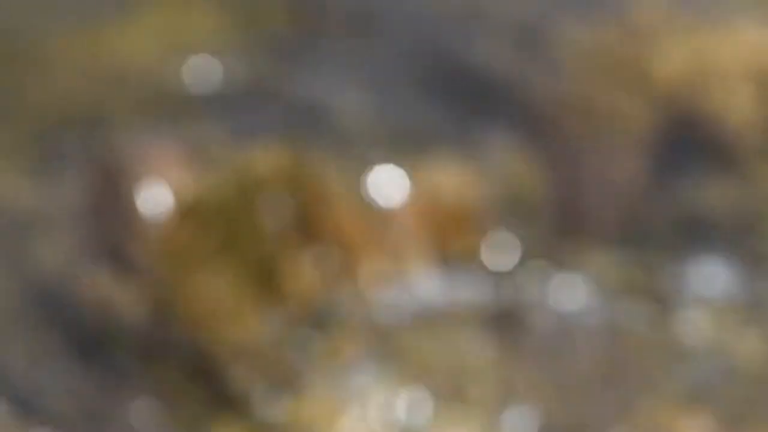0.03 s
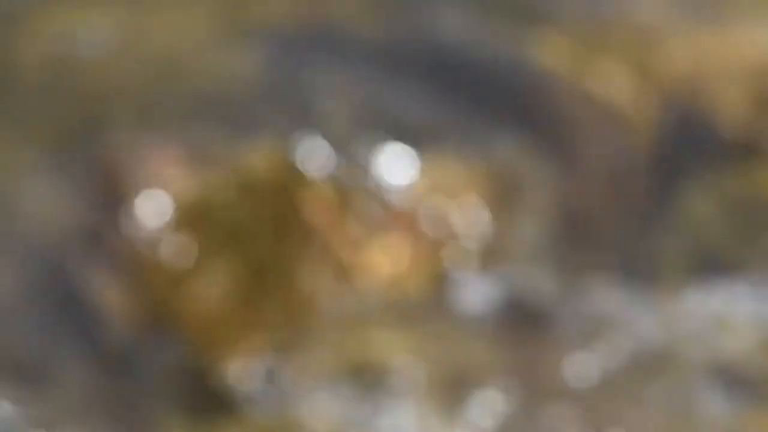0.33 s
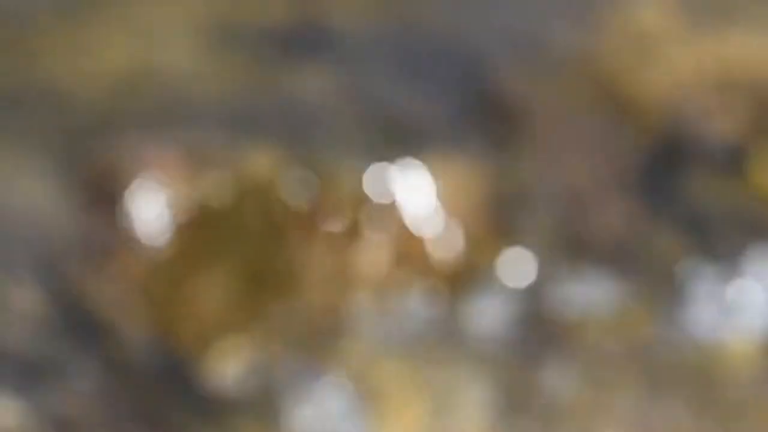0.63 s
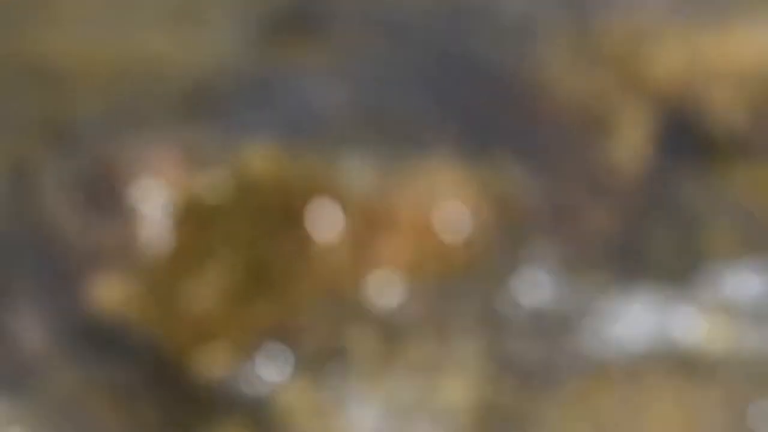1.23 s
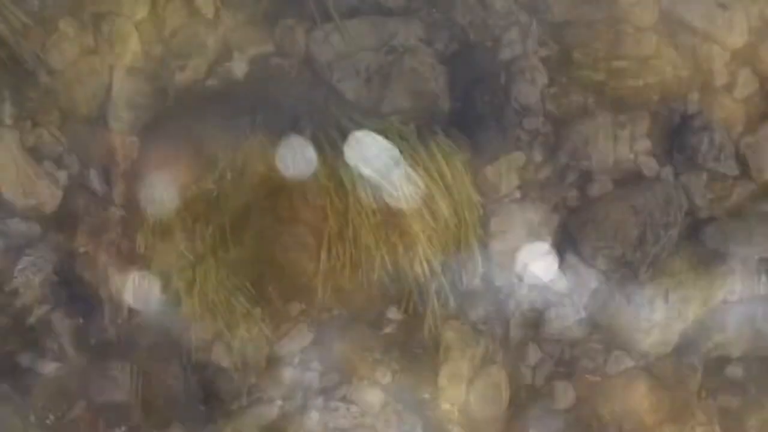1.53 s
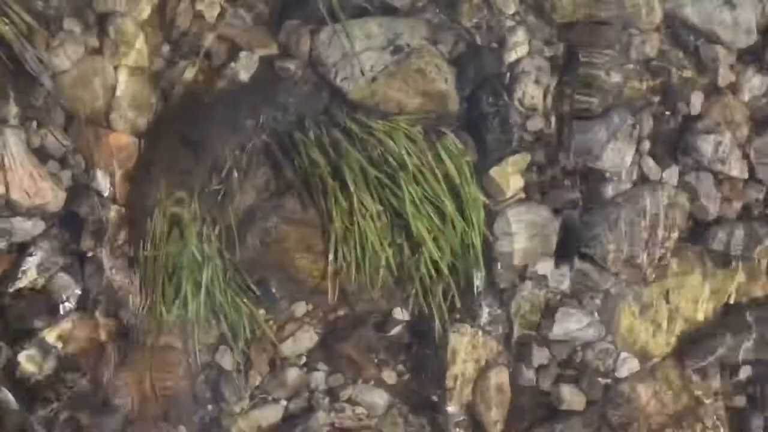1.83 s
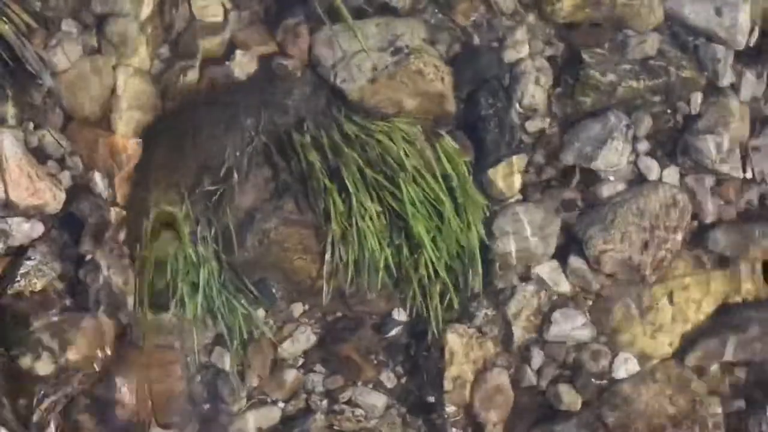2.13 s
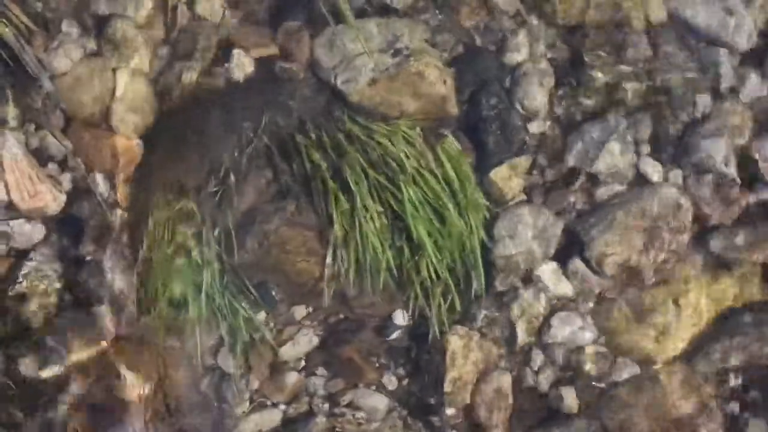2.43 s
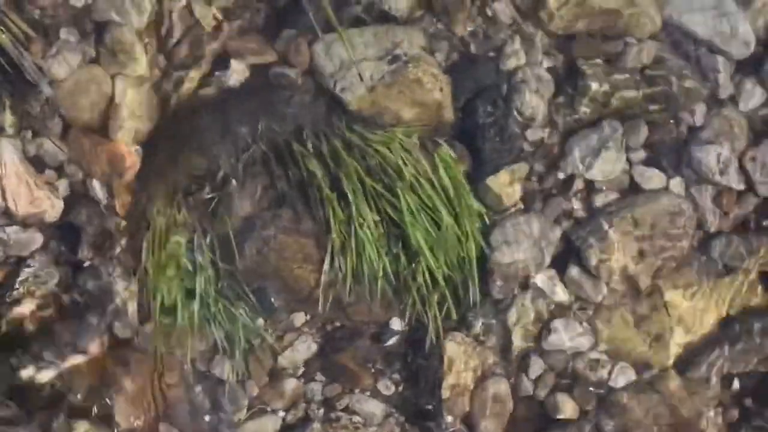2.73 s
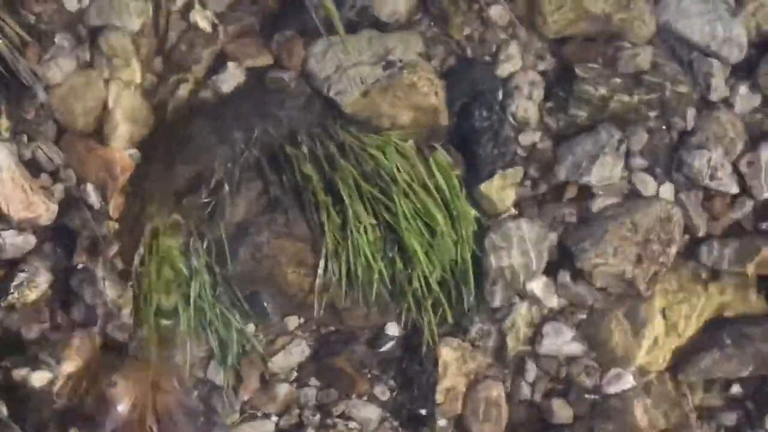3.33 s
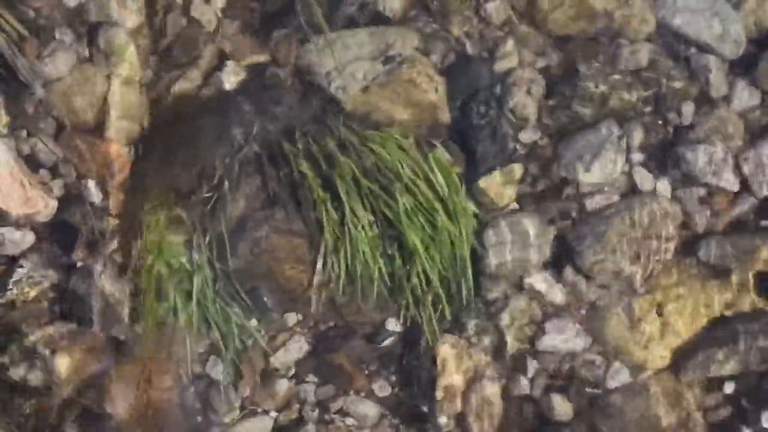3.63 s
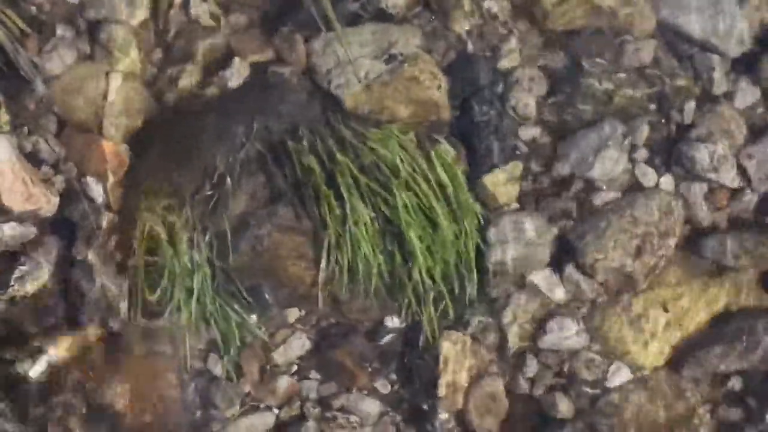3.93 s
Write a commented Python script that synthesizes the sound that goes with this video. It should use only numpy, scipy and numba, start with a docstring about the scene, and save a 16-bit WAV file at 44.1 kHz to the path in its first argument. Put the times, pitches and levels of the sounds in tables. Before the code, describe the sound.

Water trickles quietly round a stone, then gives way to a louder, steady stream rush.

```python
"""A quiet trickle round a stone, close by, wide in the treble, over a low rumble of air on the microphone.
It cross-fades into a louder, steady mono riffle: shallow water running fast over pebbles.
Both are swarms of bubbles, ringing as dying sines of rising pitch, and ticks of spray over a noise wash.
Single near bubbles plop and drops slap the surface throughout."""
import sys
import numpy as np
from scipy import signal
from scipy.fft import rfft, irfft
from scipy.io import wavfile
from numba import njit

SR = 44100
rng = np.random.default_rng(int(sys.argv[2]) if len(sys.argv) > 2 else 0)


def master_out(mix):
    """Clip the mix to full scale and print it as 16-bit PCM to the path in sys.argv[1]."""
    frames = np.transpose(np.atleast_2d(mix))
    ceiling = np.clip(frames, -1, 1)
    pcm = np.round(ceiling * 32767).astype(np.int16)
    wavfile.write(sys.argv[1], SR, pcm)


N = 176400
TIME_S, BIN_HZ = np.arange(N) / SR, np.arange(N // 2 + 1) * SR / N

# air rumble, spectral density: f/Hz, level/dB
RUMBLE_SPECTRUM = [(12, 9.5), (30, -7), (48, 4), (60, -8.5), (80, -5.5), (105, -19.5), (135, -10.5),
                   (165, -26.5), (260, -20.5)]
# air rumble, envelope: t/s, level/dB
RUMBLE_ENVELOPE = [(0, -58), (.22, -58.5), (.28, -53.5), (.38, -58), (.44, -58), (0.698, -57.5), (1.3, -58),
                   (1.5, -63.5), (1.75, -67), (2.0, -74), (4, -74.5)]
# trickle, spectral density: f/Hz, level/dB
TRICKLE_SPECTRUM = [(110, -20), (170, -9.5), (250, -5), (400, -4), (660, -2.5), (850, -4.5), (1250, -3),
                    (1600, -7.5), (2100, -10.5), (2700, -16.5), (3800, -19.5), (5500, -27), (8000, -26),
                    (13000, -26), (15000, -38)]
# flow of the trickle: t/s, gain/dB
TRICKLE_ENVELOPE = [(0, 2), (.22, 1.5), (.32, 0.5), (.39, 2.5), (.5, 0.5), (.78, -1), (.86, -1), (.97, 0.5),
                    (1.05, -2), (1.2, 0), (1.3, -5.5), (1.39, -5), (1.45, -2.5), (1.52, -2.5), (1.6, -29)]
# stereo width of the trickle: f/Hz, side minus mid/dB
TRICKLE_SIDE = [(60, -24), (130, -39), (290, -14.5), (640, -13.5), (1410, -10), (3100, -3.5), (6820, 0),
                (15000, 2)]
# fizz where the trickle breaks on the stone: t/s, boost/dB
FIZZ_SPURTS = [(.04, 3), (.17, 8), (.26, 8), (.38, 5), (.44, 5), (.55, 7), (.59, 6), (.75, 5), (.79, 7.5),
               (.97, 5), (1.125, 7), (1.16, 7), (1.22, 4), (1.32, 7), (1.44, 10), (1.505, 4)]
# riffle, spectral density: f/Hz, level/dB
RIFFLE_SPECTRUM = [(65, -66), (110, -33.5), (297, -6), (423, -3), (542, -6), (680, 0), (1050, 0),
                   (1490, -1), (1920, -4.5), (2260, -3.5), (3420, -8.5), (4120, -12), (9050, -15.5),
                   (12900, -23), (15500, -31)]
# near bubbles: t/s, f/Hz, peak/dB, T60/s, rise per T60/fraction of f, rms wobble/fraction of f
NEAR_BUBBLES = [(.05, 590, -60, .06, 0, .05), (.273, 640, -55, .11, .5, .03),
                (.304, 3050, -60, .035, 0, .01), (.347, 650, -60, .08, .7, .04),
                (.376, 1240, -55.5, .035, .2, .04), (.377, 2050, -61, .025, 0, .05),
                (.388, 1600, -57, .04, .3, .05), (.403, 590, -59, .06, 0, .03),
                (.506, 1320, -51.5, .028, .05, .02), (.541, 4650, -63, .025, .02, .02),
                (.68, 1260, -56, .09, 1.0, .04), (.887, 1200, -60, .07, .7, .06),
                (.999, 1160, -52.5, .08, .35, .04), (1.036, 2130, -55, .055, .2, .07),
                (1.067, 1150, -59, .05, 0, .15), (1.081, 1110, -60, .04, .2, .1),
                (1.213, 1200, -61, .06, .3, .12), (1.283, 820, -63, .08, .3, .04),
                (1.334, 2150, -66, .04, .1, .09), (1.969, 1510, -39, .04, .05, .02),
                (1.997, 1880, -41, .035, .05, .02), (2.444, 1250, -39, .04, .1, .03),
                (2.474, 1520, -40, .04, .05, .08), (2.516, 2650, -39.5, .018, .05, .01),
                (2.531, 3440, -41, .02, .05, .01), (2.55, 3450, -40, .025, 0, .02),
                (2.601, 1020, -41, .045, .05, .03), (3.335, 2100, -40, .035, .05, .02),
                (3.413, 1650, -39.5, .035, .05, .02), (3.971, 690, -39, .05, .05, .02)]
# drops slapping the surface: t/s, centre f/Hz, peak/dB
DROP_SLAPS = [(.044, 3600, -54), (.045, 7000, -57), (.131, 3400, -61), (.28, 5500, -60), (.339, 3300, -55),
              (.409, 12500, -53), (.44, 5300, -55), (.636, 3000, -54), (.729, 6500, -61), (.75, 3500, -56),
              (.789, 3800, -57), (.968, 2600, -57), (1.111, 8500, -56), (1.146, 900, -53),
              (1.146, 4900, -49), (1.22, 7500, -53), (1.271, 3694, -57), (1.324, 6500, -60),
              (1.436, 11000, -61), (2.072, 7600, -36), (2.17, 12000, -40), (2.452, 10500, -38),
              (2.818, 8500, -35), (3.019, 7000, -39), (3.225, 11500, -39), (3.439, 8200, -37),
              (3.7577, 4350, -28.5), (3.798, 10800, -34)]

FADE_START_S, FADE_S = 1.484, 0.45
CUTOFF_HZ = 15750


def from_db(db):
    """Decibels to gain."""
    return 10 ** (np.asarray(db) / 20)


def unit_rms(x):
    """Scale to rms 1."""
    return x / np.sqrt(np.mean(x ** 2) + 1e-20)


def spectrum_db(spectrum, hz):
    """Level at hz; falls 24 dB/octave beyond the table."""
    known_hz, db = np.transpose(spectrum)
    octave, known = np.log2(np.maximum(hz, 1)), np.log2(known_hz)
    octaves_outside = np.abs(octave - np.clip(octave, known[0], known[-1]))
    return np.interp(octave, known, db) - 24 * octaves_outside


def band(x, low_hz, high_hz):
    """Causal band-pass."""
    sos = signal.butter(2, [low_hz, min(high_hz, .45 * SR)], "band", fs=SR, output="sos")
    return signal.sosfilt(sos, x + 1e-18)


def drift(corner_hz):
    """Low-passed random wander, rms 1."""
    hop, settle = 40, 2000
    pole = np.exp(-2 * np.pi * corner_hz * hop / SR)
    noise = rng.standard_normal(N // hop + settle + 2)
    slow = signal.lfilter([1], [1, -2 * pole, pole * pole], noise)[settle:]
    return np.interp(np.arange(N) / hop, np.arange(len(slow)), unit_rms(slow))


def wash(spectrum, flicker_db, flicker_hz):
    """Distant water or moving air: coloured noise, each half-octave flickering on its own."""
    coloured = rfft(rng.standard_normal(N)) * from_db(spectrum_db(spectrum, BIN_HZ))
    half_octave = np.floor(2 * np.log2(np.maximum(BIN_HZ, 100)))
    bands = (irfft(coloured * (half_octave == k), N) for k in np.unique(half_octave))
    return unit_rms(sum(part * from_db(flicker_db * drift(flicker_hz)) for part in bands))


def rumble():
    """Air moving at the microphone, nearly mono."""
    level_db = np.interp(TIME_S, *np.transpose(RUMBLE_ENVELOPE))
    mid = wash(RUMBLE_SPECTRUM, flicker_db=.5, flicker_hz=8)
    side = from_db(-22.5) * wash(RUMBLE_SPECTRUM, flicker_db=.5, flicker_hz=8)
    return from_db(level_db) * np.array([mid + side, mid - side])


def spray(per_s, spread_db, low_hz, high_hz):
    """Tiny droplets burst as ticks, each in one of eight octave-wide bands."""
    bursts = rng.random(N) < per_s / SR
    strength_db = spread_db * np.minimum(rng.exponential(1, N), 4)
    ticks = bursts * from_db(strength_db) * rng.choice([-1, 1], N)
    centres_hz = np.geomspace(low_hz, high_hz, 8)
    band_index = rng.integers(0, len(centres_hz), N)
    return unit_rms(sum(band(ticks * (band_index == k), hz / np.sqrt(2), hz * np.sqrt(2)) / np.sqrt(hz)
                        for k, hz in enumerate(centres_hz)))


@njit
def ring_bubbles(start_s, hz, amplitude, t60_s, rise, swell_s):
    """Each bubble is a dying sine that climbs in pitch as it nears the surface."""
    out = np.zeros(N)
    for k in range(len(hz)):
        first = int(start_s[k] * SR)
        for i in range(min(int(t60_s[k] * SR), N - first)):
            t = i / SR
            age = t / t60_s[k]
            envelope = (1 - np.exp(-t / swell_s[k])) * np.exp(-6.91 * age)
            phase = 2 * np.pi * hz[k] * t * (1 + rise[k] * age / 2)
            out[first + i] += amplitude[k] * envelope * np.sin(phase)
    return out


def bubbles(spectrum, per_s, low_hz, high_hz, t60_cycles, spread_db, rise, small_bias):
    """Swarm at random times; small, high bubbles are more common per octave and die sooner."""
    when, smallness, force, sustain, climb, sign = rng.random((int(per_s * N / SR), 6)).T
    low, high = low_hz ** small_bias, high_hz ** small_bias
    hz = (low + smallness * (high - low)) ** (1 / small_bias)
    strength_db = spread_db * np.minimum(-np.log(1 - force), 3.5)
    tilt = hz ** (1 - small_bias / 2)  # offsets ring time and density: the swarm follows the spectrum
    amplitude = from_db(spectrum_db(spectrum, hz) + strength_db) * tilt * np.sign(sign - .5)
    t60_s = t60_cycles / hz * 2 ** (2 * sustain - 1)
    swarm = ring_bubbles(when * N / SR, hz, amplitude, t60_s, rise * 2 * climb, swell_s=.5 / hz)
    return unit_rms(band(swarm, 0.73 * low_hz, SR))


def lapping(spurts_db):
    """Slow water round a stone: soft wash, sparse bubbles, spurts of fizz, spattering drops."""
    bed = wash(TRICKLE_SPECTRUM, flicker_db=2.0, flicker_hz=15.4)
    gurgle = bubbles(TRICKLE_SPECTRUM, per_s=900, low_hz=417.4, high_hz=11020,
                     t60_cycles=32, spread_db=4.0, rise=0.24, small_bias=0.543)
    fizz = unit_rms(spray(per_s=4600, spread_db=-1.5, low_hz=2600, high_hz=11800) * from_db(spurts_db))
    spatter = spray(per_s=230, spread_db=6.5, low_hz=1800, high_hz=5400)
    return (from_db(-66) * bed + from_db(-69.5) * gurgle
            + from_db(-77.5) * fizz + from_db(-84.5) * spatter)


def trickle(spurt_half_s=0.017, left_over_right_db=0.5):
    """Stereo lapping: follows the flow, widens towards the treble."""
    flow_db = np.interp(TIME_S, *np.transpose(TRICKLE_ENVELOPE))
    spurts_db = sum(db * np.exp(-((TIME_S - at_s) / spurt_half_s) ** 2) for at_s, db in FIZZ_SPURTS)
    spurts_db += 2 * drift(corner_hz=30)
    hz, side_db = np.transpose(TRICKLE_SIDE)
    width = from_db(np.interp(np.log(BIN_HZ + 1), np.log(hz), side_db))
    mid = lapping(spurts_db)
    side = irfft(rfft(lapping(spurts_db)) * width, N)
    pan = from_db([[left_over_right_db / 2], [-left_over_right_db / 2]])
    return from_db(flow_db) * np.array([mid + side, mid - side]) * pan


def splashes(t60_s=.011, scatter_db=-18, edge_ratio=1.35):
    """A drop slaps the surface: one sharp click, then a faint scatter of spray."""
    out, t = np.zeros(N + SR), np.arange(SR // 20) / SR
    click = t == 0
    for start_s, hz, peak_db in DROP_SLAPS:
        first = int(start_s * SR)
        scatter = rng.standard_normal(len(t)) * from_db(scatter_db - 60 * t / t60_s)
        slap = band(click + scatter, hz / edge_ratio, hz * edge_ratio)
        out[first:first + len(t)] += from_db(peak_db) * slap / np.abs(slap).max()
    return out[:N]


def plops(swell_s=.0015, flutter_db=1.2):
    """Larger, near bubbles: swell, decay and climb in pitch, wobbling as they deform."""
    out, t = np.zeros(N + SR), np.arange(SR // 8) / SR
    wobble = drift(corner_hz=400)
    for start_s, hz, peak_db, t60_s, rise, wobble_depth in NEAR_BUBBLES:
        first = int(start_s * SR)
        envelope = (1 - np.exp(-t / swell_s)) * from_db(-60 * t / t60_s)
        pitch_hz = hz * (1 + rise * t / t60_s + wobble_depth * np.roll(wobble, -first)[:len(t)])
        tone = np.sin(2 * np.pi * np.cumsum(pitch_hz) / SR)
        out[first:first + len(t)] += from_db(peak_db) * envelope / envelope.max() * tone
    return out[:N] * from_db(flutter_db * drift(corner_hz=130))  # rippling surface


def riffle():
    """Fast, steady water over pebbles: wash, dense short bubbles, fewer that ring on, spray, tinkle."""
    bed = wash(RIFFLE_SPECTRUM, flicker_db=0.86, flicker_hz=23)
    gurgle = bubbles(RIFFLE_SPECTRUM, per_s=7000, low_hz=194.0, high_hz=10940,
                     t60_cycles=22, spread_db=2.5, rise=0.16, small_bias=0.4616)
    ringing = bubbles(RIFFLE_SPECTRUM, per_s=1300, low_hz=497.5, high_hz=13114,
                      t60_cycles=122, spread_db=2.5, rise=0.075, small_bias=.5)
    fizz = spray(per_s=1500, spread_db=3.7, low_hz=3000, high_hz=9600)
    tinkle = bubbles(RIFFLE_SPECTRUM, per_s=350, low_hz=5500, high_hz=13300,
                     t60_cycles=103, spread_db=2.5, rise=0.054, small_bias=0.71)
    return (from_db(-45.5) * bed + from_db(-46.5) * gurgle + from_db(-52.5) * ringing
            + from_db(-56.5) * fizz + from_db(-60.5) * tinkle)


def scene():
    """Wide trickle cross-fades to centred riffle; plops, splashes and rumble bypass the fade."""
    fade = np.clip((TIME_S - FADE_START_S) / FADE_S, 0, 1)
    return (1 - fade) * trickle() + fade * riffle() + plops() + splashes() + rumble()


def record(dry):
    """Steep low-pass."""
    return signal.sosfilt(signal.ellip(12, .1, 80, CUTOFF_HZ, fs=SR, output="sos"), dry)


dry = scene()
out = record(dry)
master_out(out)
```